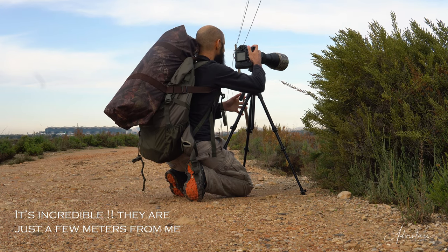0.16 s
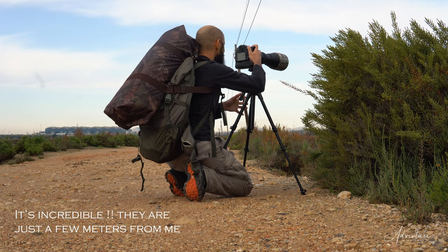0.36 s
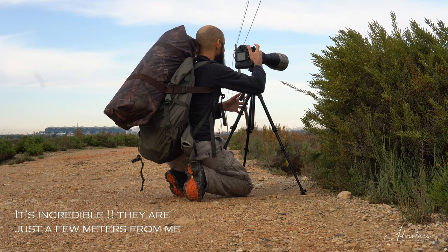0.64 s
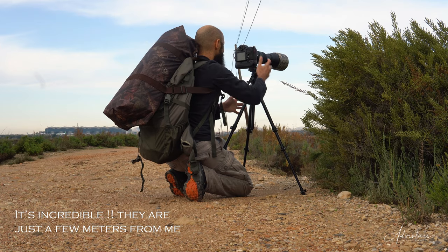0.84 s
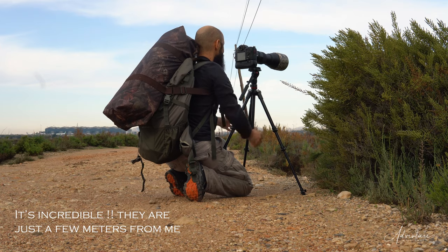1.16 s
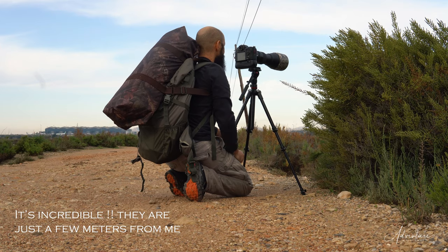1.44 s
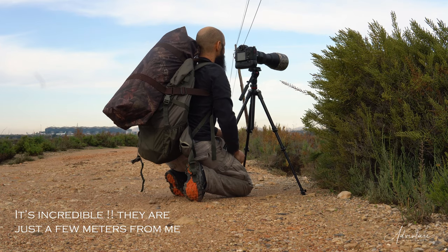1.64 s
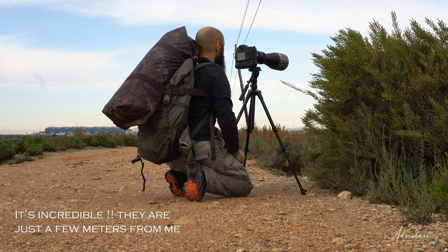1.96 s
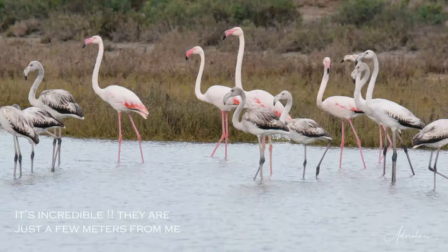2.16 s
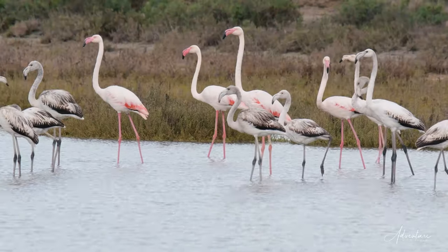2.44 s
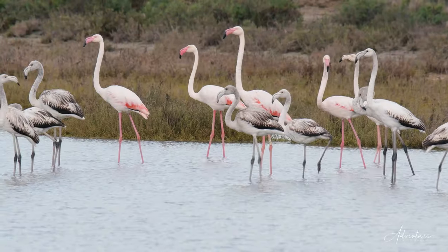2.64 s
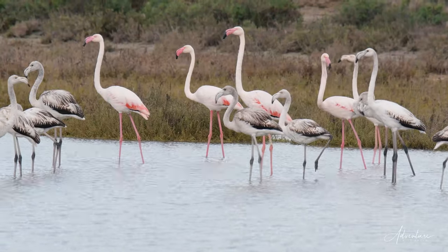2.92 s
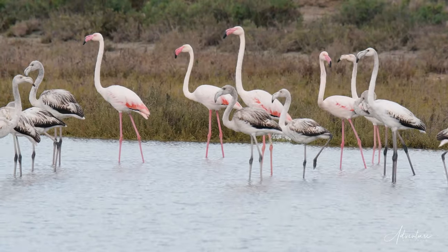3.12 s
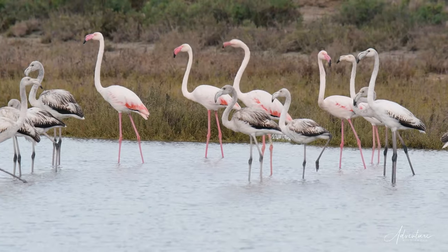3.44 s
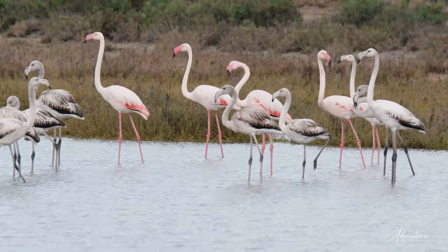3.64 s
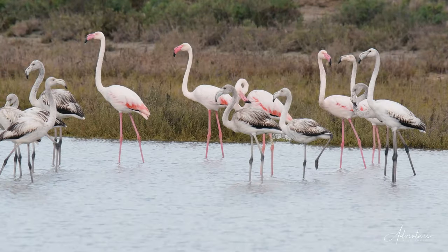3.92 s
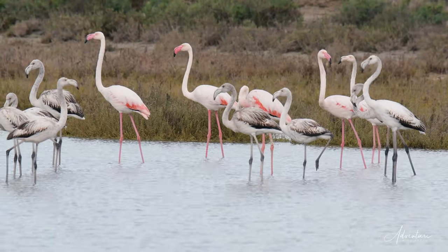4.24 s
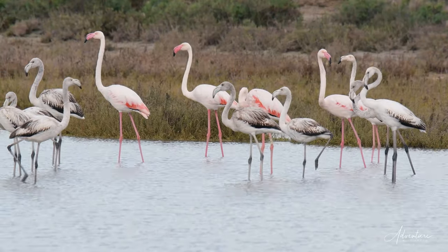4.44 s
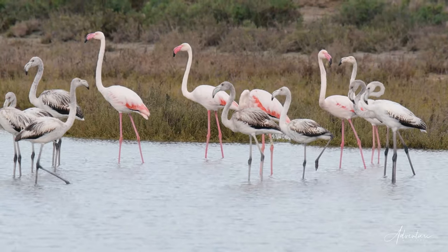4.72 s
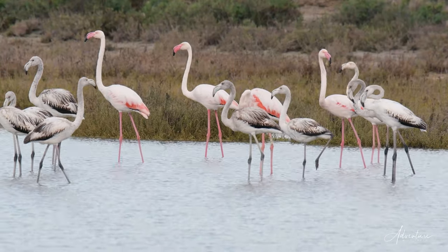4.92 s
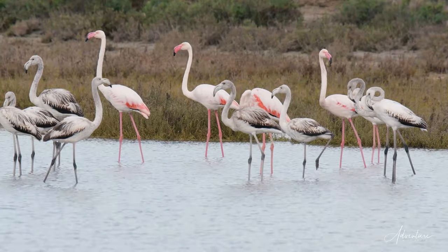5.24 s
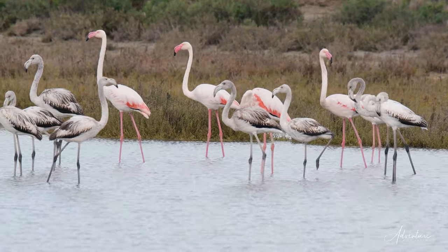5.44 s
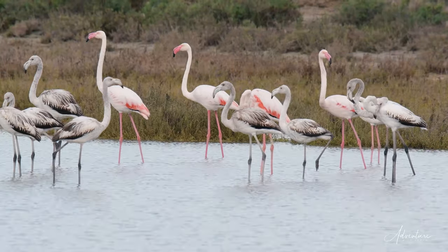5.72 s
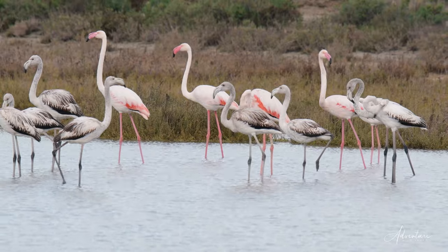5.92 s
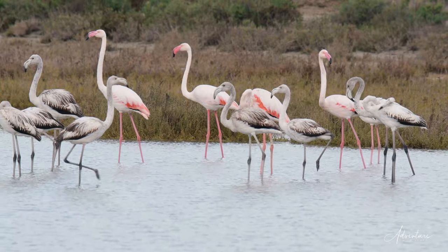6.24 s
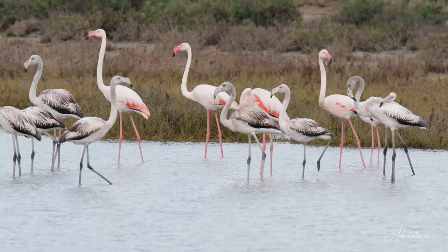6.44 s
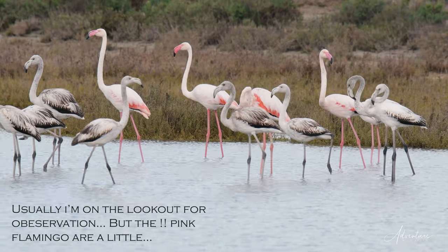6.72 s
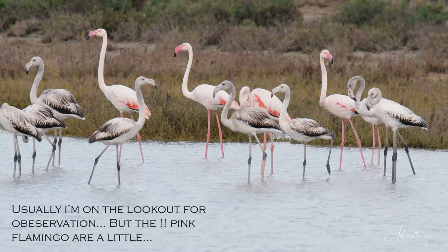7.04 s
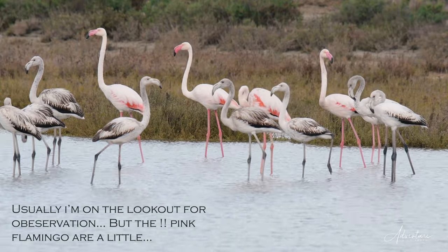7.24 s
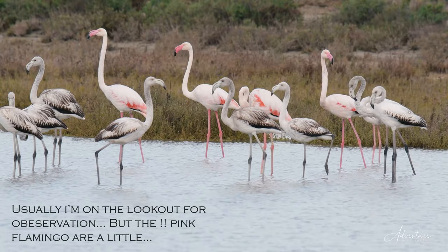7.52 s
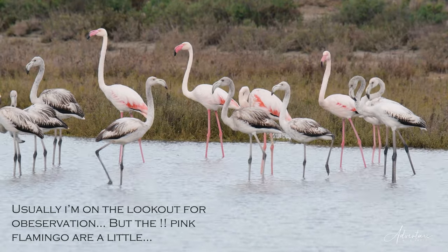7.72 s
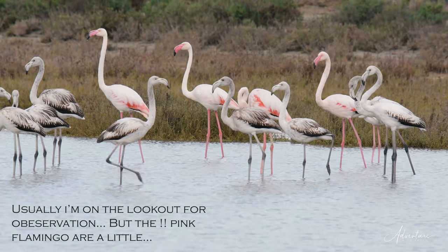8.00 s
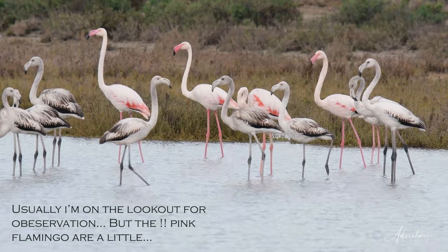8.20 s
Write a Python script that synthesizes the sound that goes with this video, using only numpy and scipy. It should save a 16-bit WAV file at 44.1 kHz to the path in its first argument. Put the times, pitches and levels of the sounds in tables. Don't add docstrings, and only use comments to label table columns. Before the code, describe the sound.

A microphone on a reedy bank catches low, flickering wind rumble and a distant wall of flock gabble with no single throat standing out. Faint rustling and rippling hiss sits above. Early, a few dry clicks of gear and twigs sound close. Short nasal wader yips follow at wide intervals, growing mostly fainter, among tiny high chips and weak hoarse cries from afar.

```python
import sys
import numpy as np
from scipy import signal
from scipy.fft import rfft, irfft
from scipy.io import wavfile
from scipy.ndimage import uniform_filter1d

SR = 44100
rng = np.random.default_rng(int(sys.argv[2]) if len(sys.argv) > 2 else 0)


def gain_from_db(level_db):
    decades = np.asarray(level_db, float) / 20
    return 10 ** decades


def file_out(sig):
    cols = np.atleast_2d(sig).T
    lim = np.clip(cols, -1, 1)
    pcm = np.round(lim * 32767).astype(np.int16)
    wavfile.write(sys.argv[1], SR, pcm)


N = 369116
T = np.arange(N) / SR
PROGRESS = np.linspace(0, 1, 7)

# (time [s], loudness of the chorus [dB], opening of the bills [dB])
FLOCK_EFFORT = [(0, -38, -8), (.47, -43, -2), (.84, -40.5, 1.5), (1.2, -39, -9), (1.7, -40.5, -7.5),
                (2.25, -38, -13), (2.9, -39, -8.5), (3.5, -38.5, -5.5), (3.95, -38.5, -6.5),
                (4.5, -40, -8.5), (5.0, -39, -8.5), (5.45, -39, -9), (5.75, -39, -5.5), (6.5, -40, -3.5),
                (6.85, -39, -9), (7.45, -40, -4.5), (7.9, -40.5, -8), (8.37, -40, -6.5)]


def columns(table):
    s, *rest = np.transpose(table)
    return [np.interp(T, s, c) for c in rest]


def band(x, colour, lo_hz, hi_hz, skirt=0.099):
    octave = np.log2(np.maximum(np.fft.rfftfreq(N, 1 / SR), 1))
    hz, db = np.transpose(colour)
    below, above = np.log2(lo_hz) - octave, octave - np.log2(hi_hz)
    low_edge = 1 + np.exp(np.clip(below / skirt, -50, 50))
    high_edge = 1 + np.exp(np.clip(above / skirt, -50, 50))
    gain = gain_from_db(np.interp(octave, np.log2(hz), db)) / np.sqrt(low_edge * high_edge)
    y = irfft(rfft(x) * gain, N)
    return y / np.std(y)


def walk(rate):
    hold = int(SR / rate)
    steps = np.repeat(rng.standard_normal(N // hold + 1), hold)
    return 1.3 * uniform_filter1d(uniform_filter1d(steps, hold), hold)[:N]


def microphone_hiss():
    # (frequency [Hz], density [dB per Hz])
    hiss_colour = [(3530, -33), (6000, -4.5), (15100, -9), (15500, -6.5)]
    return gain_from_db(-73.5) * band(rng.standard_normal(N), hiss_colour, 7200, 18700)


def wind():
    # (time [s], gust strength [dB], depth of the eddies [dB], share of small eddies [dB])
    gusts = [(0, -28.5, -2, -1.5), (.16, -22, -0.5, -1.5), (.4, -26.5, 2, 3), (1.0, -26, -1, 0),
             (1.6, -26, 0.5, -0.5), (1.8, -22.5, -0.5, 0), (2.3, -24.5, 0, -1), (2.8, -25.5, 1, 0),
             (3.7, -27, 0, -0.5), (4.3, -26.5, 0, 1.5), (4.9, -27, 1, 0), (5.4, -29, 1, 1.5),
             (5.8, -30, -2, 0.5), (6.4, -28.5, 0, 1), (6.9, -29, 0.5, -1), (7.4, -26.5, 0, 1),
             (7.9, -27.5, 0, 0), (8.37, -26.5, 0, 2.5)]
    # (frequency [Hz], density [dB per Hz])
    wind_colour = [(7.1, -31), (12, -3.5), (38, 6), (64, 0.5), (173, -8.5), (232, -14), (333, -16),
                   (386, -20), (600, -22), (780, -58), (1320, -120)]
    gust_db, depth_db, small_db = columns(gusts)
    air = rng.standard_normal(N)
    eddy_db = 0.83
    deep_db = gust_db - 3.5 + depth_db + eddy_db * walk(3)
    rumble_db = gust_db - 4.5 - depth_db + eddy_db * walk(3.087)
    wash_db = -38 + 0.14 * (gust_db + 27) + small_db + 1.16 * walk(4.09)
    deep = gain_from_db(deep_db) * band(air, wind_colour, 17.2, 60.4)
    rumble = gain_from_db(rumble_db) * band(air, wind_colour, 67.9, 162.4)
    return deep + rumble + gain_from_db(wash_db) * band(air, wind_colour, 184.3, 506)


def reeds():
    # (time [s], breeze in the reeds [dB])
    breeze = [(0, -67), (.25, -71), (.8, -65), (1.1, -66.5), (1.4, -65), (1.85, -73), (2.2, -64.5),
              (2.5, -69), (2.9, -66.5), (3.33, -70), (4.05, -70), (4.5, -67), (4.9, -67), (5.6, -72),
              (6.3, -68), (6.8, -65.5), (7.4, -67.5), (8.37, -69)]
    # (frequency [Hz], density [dB per Hz])
    reed_colour = [(1500, 2.5), (2000, -7), (2600, -16), (3300, -16), (4200, -21.5), (5500, -25.5),
                   (7000, -29.5), (9000, -34)]
    # (level [dB], share of the breeze [1], fade [dB per s], share of the flock's bill opening [1])
    ranges = [
        (-53.5, .05, 0.77, 0.14),
        (-72, 0.95, -0.28, .01),
        (-73, 0.3, 0.14, .05),
    ]
    edges_hz = [1660, 2684, 4300, 7950]
    breeze_db = columns(breeze)[0] + 68
    bill_db = columns(FLOCK_EFFORT)[1]
    rustle = rng.standard_normal(N)
    out = np.zeros(N)
    for k, (db, breeze_share, fade, bill_share) in enumerate(ranges):
        level_db = db + breeze_share * breeze_db - fade * T + bill_share * bill_db + .7 * walk(9)
        out += gain_from_db(level_db) * band(rustle, reed_colour, edges_hz[k], edges_hz[k + 1], .08)
    return out


def flock(count=30):
    # (frequency [Hz], density [dB per Hz])
    flock_colour = [(260, -31.5), (450, 1), (619, -1.5), (1010, -1), (1300, -10), (1900, -23), (2470, -47),
                    (4180, -120)]
    roar_db, bright_db = columns(FLOCK_EFFORT)
    pulses = np.zeros(N)
    for pitch_hz in rng.uniform(140, 420, count):
        periods = SR / pitch_hz * (1 + .3 * rng.standard_normal(4000)).clip(.3)
        at = np.cumsum(periods).astype(int)
        at = at[at < N]
        np.add.at(pulses, at, gain_from_db(4 * walk(5)[at]))
    tail = rfft(rng.standard_normal(N) * np.exp(-T / .03))
    far = irfft(rfft(pulses) * tail / np.abs(tail), N)
    far = far / np.std(far) + 1.5 * rng.standard_normal(N)
    body = gain_from_db(-2.0) * band(far, flock_colour, 537, 1085)
    bright = gain_from_db(bright_db) * band(far, flock_colour, 1280, 1480)
    return gain_from_db(roar_db) * (body + bright)


def ticks():
    # (time [s], level [dB], centre [Hz], width [Hz])
    contacts = [ (.814, -52, 4000, 900), (.881, -56, 5800, 1600), (1.031, -46, 3500, 900),
                (1.031, -59, 5800, 900), (1.337, -46, 4800, 1300), (1.337, -50, 6000, 1400),
                (1.378, -58, 5500, 1200), (1.779, -63, 5700, 900), (1.8105, -39, 2200, 900),
                (1.8105, -50, 3700, 800), (1.8105, -61, 5800, 800), (2.513, -55, 5600, 800), ]
    out, t = np.zeros(N), T[:400]
    for s, db, hz, width in contacts:
        at, ring = int(s * SR), np.pi * width * t
        out[at:at + len(t)] += gain_from_db(db) * np.e * ring * np.exp(-ring) * np.sin(2 * np.pi * hz * t)
    return out


def glide(call, arch_db, late_swell_db=0):
    s, length, db, from_hz, to_hz = call
    bend = 1 - (1 - PROGRESS) ** (2.3 if to_hz > from_hz else 1)
    swell_db = late_swell_db * (PROGRESS - .5) - arch_db * (2 * PROGRESS - 1) ** 2
    return s + length * PROGRESS, from_hz + (to_hz - from_hz) * bend, db + swell_db


def sing(waver, s, hz, db, rough, edge_s=0.0036):
    span = slice(int((s[0] - edge_s) * SR), int((s[-1] + edge_s) * SR))
    t = T[span]
    to_end = np.minimum(t - t[0], t[-1] - t)
    fade = np.sin(np.pi / 4 * np.clip(to_end / edge_s, 0, 2)) ** 2
    phase_waver, level_waver = waver[:, span] * rough
    phase = 2 * np.pi * np.cumsum(np.interp(t, s, hz)) / SR + phase_waver
    strength = gain_from_db(np.interp(t, s, db) + 3 * level_waver)
    return span, np.sqrt(2) * fade * strength * np.sin(phase)


def sing_all(tones):
    out, waver = np.zeros(N), np.array([walk(250), walk(180)])
    for k, tone in enumerate(tones):
        span, sound = sing(np.roll(waver, 999 * k, axis=1), *tone)
        out[span] += sound
    return out


def far_cries():
    # (time [s], length [s], level [dB], start pitch [Hz], end pitch [Hz])
    cries = [(.555, .035, -60, 2350, 2250), (.995, .045, -60, 2050, 2220), (2.155, .03, -69, 2900, 3500),
             (3.03, .04, -61, 1880, 2000), (3.03, .05, -70, 2780, 2950), (3.17, .04, -72, 3100, 3150),
             (3.11, .025, -60, 2000, 2000), (3.15, .04, -67, 2500, 2600), (3.11, .05, -76, 3950, 4000),
             (3.63, .17, -68.5, 3050, 2850), (4.605, .015, -70, 4050, 3900), (4.72, .02, -69, 3900, 3800),
             (6.33, .026, -67, 3750, 3780), (6.628, .022, -72, 3800, 3840), (6.668, .04, -65, 3400, 2500),
             (6.688, .012, -70, 4200, 3950), (6.69, .025, -68, 3400, 3300), (7.285, .035, -71, 3450, 3150),
             (7.245, .025, -72, 3700, 3550), (.675, .025, -74, 4100, 4000)]
    return sing_all([(*glide(c, arch_db=2), .45 + 9 * c[1]) for c in cries])


def chips():
    # (time [s], length [s], level [dB], start pitch [Hz], end pitch [Hz])
    calls = [(.245, .017, -73, 5600, 6350), (.261, .02, -62, 6300, 5300), (.666, .03, -63, 5100, 5980),
             (1.05, .01, -76, 6000, 6200), (2.09, .012, -71, 5400, 4950), (2.364, .018, -69, 5450, 6100),
             (2.381, .018, -66, 6150, 5200), (2.515, .01, -73, 5300, 4700), (2.774, .01, -72, 5800, 5400),
             (3.628, .01, -72, 5900, 5500), (3.832, .018, -68, 5450, 6100), (3.851, .019, -65, 6050, 5250),
             (4.122, .026, -66, 5200, 6100), (5.593, .01, -69, 5650, 5150), (6.916, .012, -75, 5750, 5750),
             (6.944, .01, -71, 5300, 4850), (7.236, .032, -66, 5100, 5880), (7.426, .012, -74, 5300, 5800)]
    return sing_all([(*glide(c, arch_db=6, late_swell_db=4), .45) for c in calls])


def yips():
    # (time [s], length [s], level [dB], high voice start [Hz], high voice end [Hz])
    calls = [
        (1.463, .046, -48, 2285, 2300),
        (2.248, .046, -50.5, 2350, 2400),
        (3.422, .046, -55.5, 1960, 2260),
        (5.454, .04, -69, 2250, 2950),
        (6.31, .035, -55.5, 2150, 2400),
        (7.25, .028, -84, 2120, 2140),
        (7.554, .028, -57, 2400, 2740),
    ]
    # (low voice at the start [Hz], then four upper mixing lines against the high voice [dB])
    voices = [ (1170, -18, -28, -18, -27), (1190, -21, -16, -12, -20), (1180, -22, -16, -11, -13),
              (1200, 1, -2, -25, -25), (1160, -6, -12, -14, -22), (1100, 2, 6, 6, 13),
              (1280, -9, -19, -28, -28), ]
    mixing = [(1, 0), (1, 1), (1, 2), (2, 0), (2, 1)]
    tones = []
    for call, (low_hz, *lines) in zip(calls, voices):
        s, high_hz, db = glide(call, arch_db=3)
        low_hz = low_hz - 4000 * (s - s[0])
        bloom_db = (.045 * (high_hz[-1] - high_hz)).clip(0, 7)
        for (m, n), line_db in zip(mixing, [0] + lines):
            upper = m + n - 1
            effort_db = 4 * (n - m + 1) * (PROGRESS - .5)
            effort_db -= 6 * (m - 1) * (2 * PROGRESS - 1) ** 2
            effort_db -= min(upper, 1) * bloom_db
            tones.append((s, m * high_hz + n * low_hz, db + effort_db + line_db, .15 + .25 * upper))
    return sing_all(tones)


def scene():
    background = microphone_hiss() + wind() + reeds() + flock()
    return (background + ticks() + far_cries() + chips() + yips())[None]


def band_limit(x):
    return signal.sosfilt(signal.butter(12, 15670, fs=SR, output="sos"), x)


def record(dry):
    mix = np.tanh(1.5 * dry) / 1.496
    return band_limit(mix)


dry = scene()
out = record(dry)
file_out(out)
```